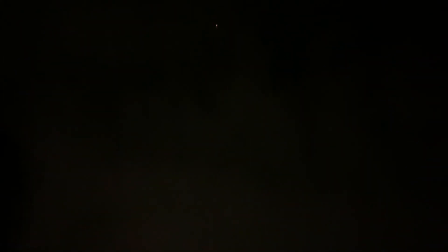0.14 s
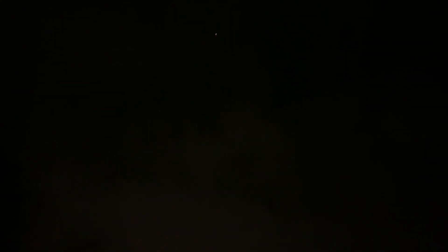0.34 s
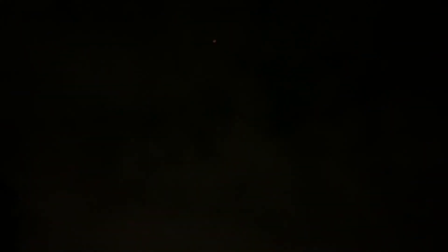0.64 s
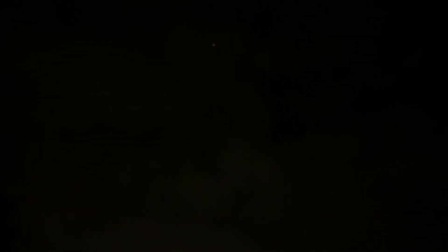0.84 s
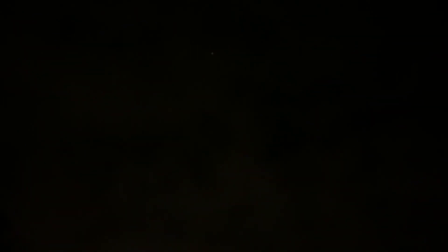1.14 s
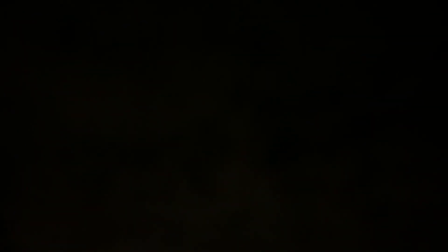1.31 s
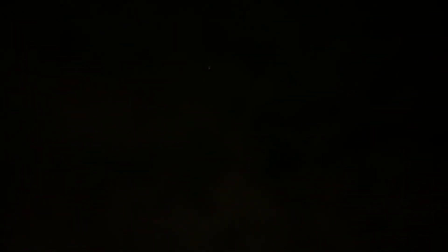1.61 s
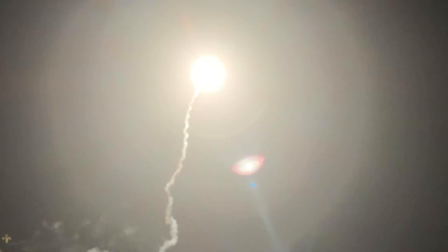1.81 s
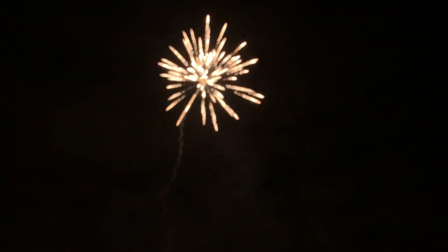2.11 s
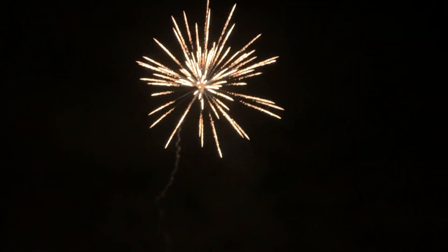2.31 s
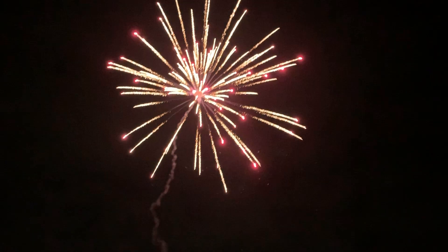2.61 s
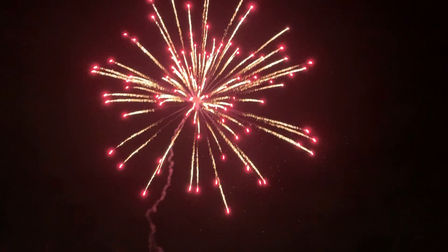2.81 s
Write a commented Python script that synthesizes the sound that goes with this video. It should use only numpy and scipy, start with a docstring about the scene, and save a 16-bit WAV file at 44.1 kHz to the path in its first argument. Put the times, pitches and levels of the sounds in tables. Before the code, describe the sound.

Outdoors at night, a climbing rocket's very faint hiss fades among quick insect pulses and low rumble, a dull distant thud sounds, then the firework bursts overhead in a hard bang with rolling, darkening echoes in wide stereo.

```python
"""Outdoors at night, a rocket's hiss fades unevenly into the distance: noise with a moving level.
Around it an insect pulses about eight times a second in bands of noise, over night air and low rumble;
at 1.4 s a far thud sounds, dull noise dying away. At 2.1 s the shell bursts overhead: rough noise leads
into a steep shock step, a thump falling in pitch, then shock and thump again off the ground while near
surfaces scatter noise. Last, echoes roll in from the land as three noise bands with their own levels,
the highest treble wearing away."""
import sys
import numpy as np
from scipy import signal
from scipy.fft import rfft, irfft, next_fast_len
from scipy.io import wavfile
from scipy.ndimage import uniform_filter1d

SR = 44100
rng = np.random.default_rng(int(sys.argv[2]) if len(sys.argv) > 2 else 0)


def wav_record(signal):
    """Record a signal, one row per channel, as 16-bit PCM in the file named by sys.argv[1]."""
    frames = np.transpose(np.atleast_2d(signal))
    bounded = np.clip(frames, -1, 1)
    # unit amplitude maps onto the largest positive 16-bit level
    quanta = np.round(bounded * 32767).astype(np.int16)
    wavfile.write(sys.argv[1], SR, quanta)


N = 130095
T = np.arange(N) / SR  # s

# In every *_COLOUR table: pitch_hz, density_db (relative power per Hz; each noise is scaled to rms 1)
# Shocks, overhead and then off the ground: start_s (left), level_db (initial step), right_leads_s
SHOCKS = [(2.12585, -2.5, .00023), (2.14388, -2, .00025)]
# The housing's ring at each shock: pitch_hz, level_db (against the step), t60_s
HOUSING_RING = [(6800, -8, .001), (11000, -4, .0009), (14800, -8, .0008)]
SHOCK_S, FIZZ_DB, FIZZ_T60_S = 0.00005, -16, 0.004  # step decay; fizz level against the step, its decay
# Falling thump, on the left before its ground copy: start_s, pitch_hz, peak_db
THUMP = [(2.1258, 600, -5), (2.1271, 540, -2), (2.1283, 340, -.5), (2.1305, 320, -.5), (2.1314, 240, -.5),
         (2.133, 125, -1), (2.135, 90, -1.5), (2.142, 60, -5), (2.147, 110, -10), (2.155, 90, -20),
         (2.18, 85, -32), (2.25, 85, -60)]
THUMP_S, THUMP_RIGHT_DB, THUMP_LAG_S = 2.1258, -3.5, 0.00021  # start; level and lag at the right
GROUND_S, GROUND_DB, GROUND_HZ = 0.0181, -8, 220  # ground copy: delay, loss, pitch below which it thins
# Noise leading into the first shock, on the left: start_s, level_db
LEADING = [(2.108, -35), (2.116, -27), (2.1178, -16), (2.1185, -6), (2.1255, -7), (2.1268, -17.5),
           (2.128, -53)]
LEADING_COLOUR = [(150, -21), (280, -7), (390, 0), (500, -8), (630, -4), (1050, -13), (1600, -19),
                  (2800, -35), (4500, -28.5), (6500, -26.5), (8500, -41), (10000, -59)]
# Left-right likeness of the burst's noise: pitch_hz, correlation (-1 to 1)
BURST_ALIKE = [(300, 0.76), (650, 0.35), (1000, 0.54), (2500, 0.54), (5000, .05)]
LEADING_RIGHT_DB = 2  # right against left
# Near surfaces answering the burst: start_s, level_db
SCATTER = [(2.127, -32), (2.133, -25), (2.137, -11), (2.140, -17.5), (2.144, -9.5), (2.148, -13.5),
           (2.152, -24), (2.165, -26.5), (2.19, -43.5), (2.23, -56.5)]
SCATTER_COLOUR = [(88, -30), (150, -4), (388, -0.5), (695, -9.5), (2500, -18), (2860, -21.5), (3760, -20.5),
                  (7270, -28), (8660, -44), (10700, -29), (15500, -46)]
# Echoes from the land: start_s, bass_db, middle_db, treble_db (before ECHO_TREBLE_LIFT_DB)
ECHOES = [(2.17, -23.5, -38, -41.5), (2.196, -31, -36.5, -41), (2.316, -36, -39, -42.5),
          (2.404, -34, -34.5, -36), (2.444, -27.5, -30.5, -41), (2.464, -32.5, -31.5, -38.5),
          (2.48, -35.5, -33.5, -42.5), (2.516, -34, -40, -43), (2.554, -41, -37.5, -44.5),
          (2.574, -42, -39.5, -46.5), (2.598, -43, -38.5, -45.5), (2.634, -33.5, -38, -46),
          (2.74, -45, -44.5, -50), (2.77, -39, -44.5, -50.5), (2.808, -43.5, -42.5, -54.5),
          (2.846, -40, -44.5, -57), (2.884, -47, -46, -55), (2.95, -42, -42, -55)]
ECHO_TREBLE_LIFT_DB = 2.45
# Colours of the three echo bands
ECHO_BASS_COLOUR = [(15, -46.5), (25, -14.5), (70, -3.5), (141, -6), (210, -1), (358, -2.5), (450, -7.5),
                    (580, -40.5), (990, -120)]
ECHO_MIDDLE_COLOUR = [(260, -37), (450, -5), (652, -4), (976, -3.5), (1320, -11), (1400, -8.5),
                      (1820, -27.5), (3080, -120)]
ECHO_TREBLE_COLOUR = [(820, -34), (1400, -8), (1870, -1), (6210, -14), (7590, -15.5), (8650, -32.5),
                      (9560, -18.5), (11600, -26.5), (12700, -36.5), (13100, -67), (14200, -43.5),
                      (15500, -45)]
# Relative wear of the echo treble by the air: pitch_hz, loss_db_per_s
AIR_LOSS = [(500, -8.5), (2000, -3.5), (4000, 5), (7000, 24), (11000, 58.5), (13500, 90), (15000, 112)]
# Left-right likeness of echoes and thud, then of the quieter background: pitch_hz, correlation
ALIKE = [(60, 0.84), (130, 0.94), (290, 0.71), (640, 0.44), (1410, -0.036), (3100, -0.55), (6820, 0.11),
         (15000, 0.73)]
ALIKE_FAR = [(60, 0.85), (130, 0.92), (290, 0.5), (640, 0.22), (1410, 0.33), (3100, 1), (6820, 0.1),
             (15000, 0.44)]
# Far thud and its repeats: start_s, level_db, t60_s
THUDS = [(1.367, -53.5, 0.32), (1.411, -55.5, 0.22), (1.455, -62.5, 1.6)]
THUD_COLOUR = [(24, -41), (45, -5), (85, 3), (145, -7), (230, -2.5), (320, -3.5), (450, -22.5), (800, -22),
               (1100, -51)]
# Insect pulses: start_s (at the top of the swell), level_db
PULSES = [(.09, -58.5), (.2, -66), (0.342, -54), (.47, -59), (.6, -66.5), (.73, -61.5), (.86, -73),
          (.98, -70), (1.11, -77), (1.24, -74), (1.37, -74), (1.49, -80), (1.6, -80), (1.71, -74.5),
          (1.84, -69), (1.96, -71.5), (2.07, -70.5)]
PULSE_RISE_S, PULSE_FALL_S = 0.045, 0.04
INSECT_COLOUR = [(2500, -25), (3500, -6.5), (5000, -1.5), (6700, 3), (8000, -9), (8700, -15), (9400, 0.5),
                 (10500, 4), (12300, -2.5), (13200, -12), (14200, -34), (15000, -23)]
# Hiss of the climbing rocket: start_s, level_db
HISS = [(0, -58), (.3, -58.5), (.55, -61.5), (.8, -63), (1.1, -71.5), (1.5, -84), (2.0, -76.5),
        (2.95, -82.5)]
HISS_COLOUR = [(240, -51), (400, -17.5), (1100, -5.5), (2320, -8.5), (3850, -0.5), (5480, -9), (6580, 3.5),
               (7440, -2), (8400, -28), (9210, -10.5), (10400, -3), (12300, -22.5), (15500, -57)]
# Low rumble of the air: start_s, level_db
RUMBLE = [(0, -69.5), (.12, -87), (.2, -65), (.4, -66.5), (.55, -68.5), (.67, -64), (.76, -74), (1.0, -69),
          (1.2, -84), (1.35, -67.5), (1.55, -67.5), (1.7, -67), (1.85, -67), (2.95, -66)]
RUMBLE_COLOUR = [(20, -22), (45, -8), (70, 2.5), (110, -3), (200, -59.5)]
# Steady night air
NIGHT_COLOUR = [(15, -42), (25, 1), (82, -5.5), (139, -4.5), (219, -1), (431, -10.5), (682, -6.5),
                (808, -10.5), (1030, -5), (1310, -12), (1970, -10), (2340, -17.5), (3880, -5), (5180, -11),
                (6600, -8.5), (8000, -31), (10400, -60), (17600, -120)]
NIGHT_DB = -61
# Notches and peaks of the microphone housing, for diffuse sound: pitch_hz, gain_db
MIC = [(7600, 0.36), (8200, 1), (8600, -32), (9000, -0.5), (9400, 0.7), (12400, -0.2), (13000, -8),
       (13700, -14), (14600, 9), (15300, 3)]
RIGHT_DB, LEFT_LEADS_S = 0.3, 0.00007  # right against left, left ahead of right, for diffuse sound
CEILING, KNEE, TOP_HZ = 0.97, 5, 15700  # soft clip limit (full scale 1) and sharpness; middle of band edge


def amp(db):
    """dB to gain."""
    return 10 ** (np.asarray(db) / 20)


def unit(x):
    """Scaled to rms 1."""
    return x / np.sqrt(np.mean(x ** 2) + 1e-20)


def along(points, hz):
    """Value at each frequency, read between points on a log axis."""
    f, v = np.transpose(points)
    return np.interp(np.log(hz + 1), np.log(f + 1), v)


def curves(rows):
    """One value per sample for each column after the time."""
    s, *cols = np.transpose(rows)
    return [np.interp(T, s, c) for c in cols]


def ramp(start_s, rise_s):
    """Straight fade-in from 0 to 1."""
    return np.clip((T - start_s) / rise_s, 0, 1)


def filtered(x, response):
    """x times a complex response of frequency."""
    m = next_fast_len(N + SR // 2)
    return irfft(rfft(x, m) * response(np.fft.rfftfreq(m, 1 / SR)), m)[..., :N]


def closed(colour):
    """A colour falling away to -120 dB beyond its ends."""
    return [(colour[0][0] / 2, -120), *colour, (colour[-1][0] * 1.3, -120)]


def rush(colour, alike, patchy_db, dulls_from=None):
    """Stereo noise of rms 1 with narrow patches of random gain; its treble may wear away with time."""
    hz, t, z = signal.stft(rng.standard_normal((2, N)), SR, nperseg=1024)
    field = uniform_filter1d(rng.standard_normal(z.shape[1:]), size=2, axis=0)
    field = uniform_filter1d(field, size=5, axis=1)
    gain_db = patchy_db * unit(field)
    if dulls_from:
        gain_db = gain_db - along(AIR_LOSS, hz)[:, None] * np.maximum(t - dulls_from, 0)
    pair = signal.istft(z * amp(gain_db), SR, nperseg=1024)[1][:, :N]

    def mid_side(f):
        # half the angle whose cosine is the correlation shares the power between mid and side
        turn = np.arccos(np.clip(along(alike, f), -1, 1)) / 2
        return amp(along(colour, f)) * [np.cos(turn), np.sin(turn)]

    mid, side = filtered(pair, mid_side)
    return unit(np.array([mid + side, mid - side]))


def shocks():
    """Steep pressure steps that ring the housing, with a short fizz, reaching the right side first."""
    out = np.zeros((2, N))
    noise = rng.standard_normal((2, N))
    for s, db, lead in SHOCKS:
        t = np.maximum([T - s, T - s + lead], 0)  # time since arrival, left and right
        u = t / SHOCK_S
        step = (1 - u) * np.exp(-u)  # pressure jumps, then swings below zero and recovers
        ring = sum(amp(level - 60 * t / t60) * np.sin(2 * np.pi * hz * t)
                   for hz, level, t60 in HOUSING_RING)
        fizz = amp(FIZZ_DB - 60 * t / FIZZ_T60_S) * noise
        out += (t > 0) * amp(db) * (step + ring + fizz)
    return out


def thump():
    """The low swing of the blast, a sine falling in pitch, and its thinner copy off the ground."""
    hz, db = curves(THUMP)
    on = T >= THUMP_S
    direct = -amp(db) * on * np.sin(2 * np.pi * np.cumsum(hz * on) / SR)
    thinned = direct / (1 + (GROUND_HZ / hz) ** 2)
    left = direct + amp(GROUND_DB) * np.interp(T - GROUND_S, T, thinned)
    right = amp(THUMP_RIGHT_DB) * np.interp(T - THUMP_LAG_S, T, left)
    return np.array([left, right])


def leading_noise():
    """Rough noise just before the shock, under a fast level curve, stronger at the right."""
    level = ramp(LEADING[0][0], 0.0033) * amp(curves(LEADING)[0]) * (T < LEADING[-1][0])
    noise = rush(closed(LEADING_COLOUR), BURST_ALIKE, patchy_db=-1.8)
    return level * noise * amp([[0], [LEADING_RIGHT_DB]])


def scatter():
    """Near surfaces throw the burst back as noise in overlapping surges."""
    level = ramp(SCATTER[0][0], 0.002) * amp(curves(SCATTER)[0]) * (T < SCATTER[-1][0])
    return level * rush(SCATTER_COLOUR, BURST_ALIKE, patchy_db=2.0)


def echoes():
    """The land answers in waves of three noise bands, some brighter, the highest treble wearing away."""
    bass_db, middle_db, treble_db = curves(ECHOES)
    bass = amp(bass_db) * rush(ECHO_BASS_COLOUR, ALIKE, patchy_db=1.06)
    middle = amp(middle_db) * rush(ECHO_MIDDLE_COLOUR, ALIKE, patchy_db=2.5)
    treble = rush(ECHO_TREBLE_COLOUR, ALIKE, patchy_db=3.0, dulls_from=2.326)
    treble = amp(treble_db + ECHO_TREBLE_LIFT_DB) * treble
    return ramp(2.145, 0.015) * (bass + middle + treble)


def thuds():
    """A far, dull report with repeats, noise dying away exponentially."""
    fade = sum(ramp(s, 0.006) * amp(db - 60 * np.abs(T - s) / t60) for s, db, t60 in THUDS)
    return fade * rush(THUD_COLOUR, ALIKE, patchy_db=0.0)


def insect():
    """Raspy noise in pulses that swell and fall on bell-shaped slopes."""
    swell = 0
    for s, db in PULSES:
        width = np.where(T < s, PULSE_RISE_S, PULSE_FALL_S)
        swell = swell + amp(db) * np.exp(-((T - s) / width) ** 2)
    return swell * rush(closed(INSECT_COLOUR), ALIKE_FAR, patchy_db=1.0)


def rocket_hiss():
    """The climbing rocket's rushing noise, fading unevenly with distance."""
    return amp(curves(HISS)[0]) * rush(HISS_COLOUR, ALIKE_FAR, patchy_db=3)


def low_rumble():
    """Low air noise whose level wanders."""
    return amp(curves(RUMBLE)[0]) * rush(RUMBLE_COLOUR, ALIKE_FAR, patchy_db=3.5)


def night_air():
    """Broad night noise held at one level."""
    return amp(NIGHT_DB) * rush(NIGHT_COLOUR, ALIKE_FAR, patchy_db=4)


def housing(diffuse):
    """The microphone housing colours diffuse sound; right is a little louder, left a little earlier."""
    side = np.array([[-0.5], [0.5]])

    def response(hz):
        delay = np.exp(-2j * np.pi * hz * side * LEFT_LEADS_S)
        return amp(along(MIC, hz) + side * RIGHT_DB) * delay

    return filtered(diffuse, response)


def scene():
    """The burst arrives straight; echoes and background arrive diffuse, through the housing."""
    diffuse = rocket_hiss() + low_rumble() + night_air() + insect() + thuds() + echoes()
    burst = leading_noise() + thump() + scatter() + shocks()
    return housing(diffuse) + burst


def record(dry):
    """Soft clipping rounds off the peaks, then a 500 Hz wide edge limits the band."""
    held = dry / (1 + np.abs(dry / CEILING) ** KNEE) ** (1 / KNEE)

    def band_edge(hz):
        return np.sin(np.pi / 2 * np.clip((TOP_HZ - hz) / 500 + 0.5, 0, 1)) ** 2

    return filtered(held, band_edge)


dry = scene()
out = record(dry)
wav_record(out)
```